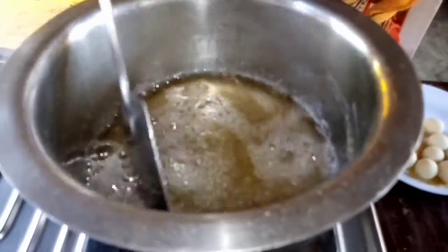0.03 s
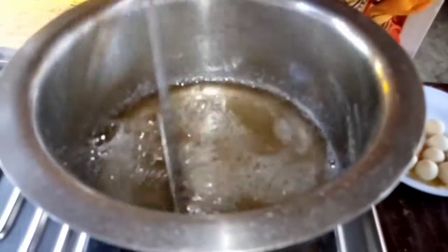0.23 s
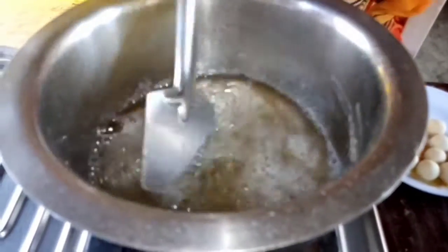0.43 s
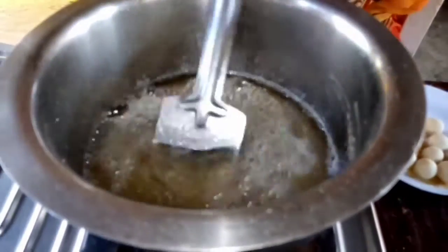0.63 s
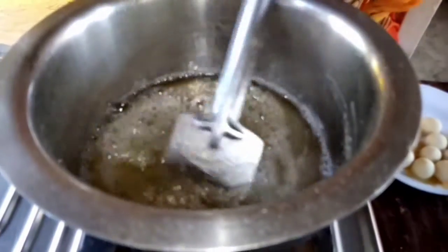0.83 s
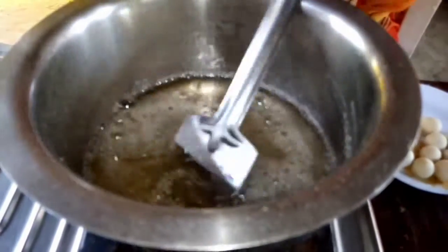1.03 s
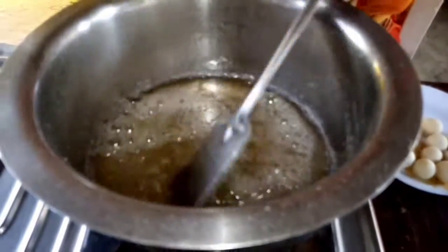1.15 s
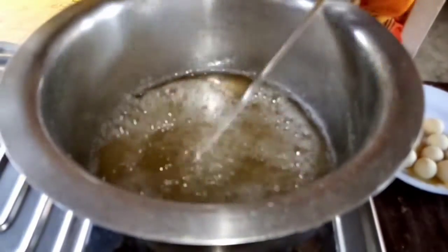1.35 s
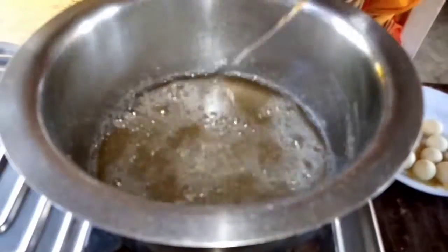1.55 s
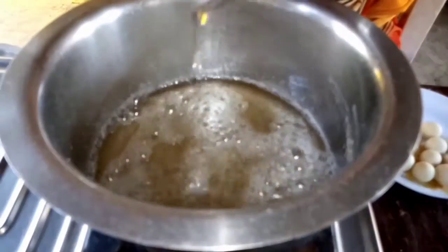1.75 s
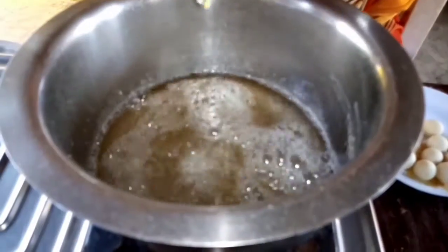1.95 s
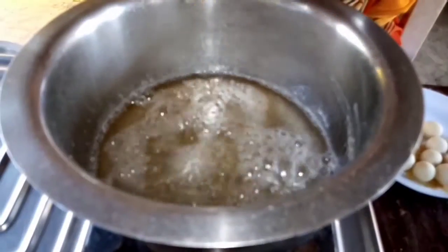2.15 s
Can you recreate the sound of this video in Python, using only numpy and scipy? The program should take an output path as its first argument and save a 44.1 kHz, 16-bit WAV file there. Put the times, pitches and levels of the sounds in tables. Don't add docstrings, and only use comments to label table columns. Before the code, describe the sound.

A steel spatula clatters onto the bottom of a metal pot, bounces, rings and scrapes, then lifts away, leaving quiet hissing, popping syrup over a low gas flame; close above the rim, faintly roomy.

```python
import sys
import numpy as np
from scipy import signal
from scipy.fft import rfft, irfft
from scipy.io import wavfile
from scipy.ndimage import uniform_filter1d

SR = 44100
rng = np.random.default_rng(int(sys.argv[2]) if len(sys.argv) > 2 else 0)


def to_linear_factor(level_db):
    exponent = np.asarray(level_db, float) / 20
    return 10 ** exponent


def master(y):
    cut = np.clip(np.atleast_2d(y).T, -1, 1)
    pcm = np.round(cut * 32767)
    wavfile.write(sys.argv[1], SR, pcm.astype(np.int16))


N = 97020


def set_level(x, db):
    return x * to_linear_factor(db) / np.sqrt(np.mean(x ** 2))


def high_pass(x, order, hz):
    return signal.sosfilt(signal.butter(order, hz, "high", fs=SR, output="sos"), x)


def band(x, hz, width_hz):
    b, a = signal.iirpeak(min(float(hz), 0.45 * SR), hz / width_hz / 1.55, fs=SR)
    once = signal.lfilter(b, a, x)
    return signal.lfilter(b, a, once)


def ring(x, modes):
    out = np.zeros(len(x))
    for hz, db, t60 in modes:
        pole = np.exp(2j * np.pi * hz / SR - np.log(1000) / (t60 * SR))
        out += to_linear_factor(db) * signal.lfilter([1], [1, -pole], x).imag
    return out


def colour(x, points):
    hz, db = np.array(points, float).T
    bins_hz = np.fft.rfftfreq(len(x), 1 / SR)
    gain_db = np.interp(np.log(bins_hz + 1), np.log(hz), db)
    return irfft(rfft(x) * to_linear_factor(gain_db), len(x))


def walk(rate_hz):
    hold = int(SR / rate_hz)
    steps = np.repeat(rng.standard_normal(N // hold + 1), hold)
    wander = uniform_filter1d(uniform_filter1d(steps, hold), hold)[:N]
    return (wander - wander.mean()) / wander.std()


def clicks(per_s, scatter_db):
    chance, side, size = rng.random((3, N))
    happens = chance < per_s / SR
    return set_level(happens * np.sign(side - 0.5) * to_linear_factor(-scatter_db * np.log(size + 0.01)), 0)


def tail(t60, seconds):
    t = np.arange(int(seconds * SR)) / SR
    noise = rng.standard_normal(len(t)) * to_linear_factor(-60 * t / t60)
    return noise / np.sqrt(np.sum(noise ** 2))


# (frequency [Hz], width [Hz], level [dB])
SIMMER_BANDS = [(616, 117, 2.5), (450, 75, -0.5), (1295, 154, -7), (1890, 280, -14.5), (3100, 920, -6.5),
                (4800, 1580, -3), (6070, 750, -3), (9730, 1600, -15), (15000, 840, -4.5),
                (13100, 2700, -15.5)]


def simmer():
    pops = to_linear_factor(-6) * clicks(per_s=700, scatter_db=4.5)
    swell_db = 1.0 * walk(4.02)
    out = np.zeros(N)
    for hz, width_hz, db in SIMMER_BANDS:
        flicker_db = 0.5 * walk(17.63)
        hiss = rng.standard_normal(N)
        out += to_linear_factor(db + swell_db + flicker_db) * band(hiss + pops, hz, width_hz)
    return set_level(out, -55)


def ticks():
    fade = to_linear_factor(-60 * np.arange(441) / SR / 0.005)
    noise = rng.standard_normal(N)
    envelope = signal.fftconvolve(clicks(per_s=150, scatter_db=3.0), fade)[:N]
    snap = high_pass(noise * envelope, 2, 6000)
    mic_peak = band(snap, 15000.0, 1100.0)
    return set_level(snap + to_linear_factor(5.0) * mic_peak, -68)


# (time [s], level [dB])
BOIL_LEVEL = [
    (0, 0.5),
    (.2, 0),
    (.5, -2),
    (.8, -2),
    (1.1, -0.5),
    (1.3, 0),
    (1.6, 1),
    (1.9, 0),
    (2.2, -1.5),
]


def boil(t):
    return to_linear_factor(np.interp(t, *np.array(BOIL_LEVEL).T)) * (simmer() + ticks())


# (frequency [Hz], level [dB per Hz])
FLAME_SPECTRUM = [(12, -63), (20, -35.5), (37, -38), (59, -12), (191, -6), (249, -8), (309, -25),
                  (420, -18), (550, -32.5), (920, -120)]


def burner(t):
    noise = rng.standard_normal(N)
    flutter_db, rise_db_per_s = 3.5, 2.5
    swell = to_linear_factor(flutter_db * walk(8.51) + rise_db_per_s * t)
    return set_level(colour(noise, FLAME_SPECTRUM) * swell, -67.5)


# (time [s], level [dB], floor thud [dB], blade ring [dB], rattle length [s])
BLADE_KNOCKS = [(0.206, -47, -13, -28, 0.00326), (0.2162, -18, -1, -34, 0.014),
                (0.2329, -23.5, 4.5, -18, 0.06), (.249, -23, -2, -16, 0.043), (.262, -25, 3.5, -31, 0.034),
                (.2725, -26.5, 0, -38, 0.029), (0.282, -40, 4.5, -30, 0.027),
                (0.288, -37, 10.5, -37, 0.023), (.349, -40.5, 3.5, -36, 0.033),
                (.372, -47.5, 5, -19, 0.0069), (0.5499, -25.5, -42, -3.5, 0.098),
                (0.5568, -22.5, -44, -13, 0.039), (0.684, -33, 2.5, -11, 0.05),
                (0.703, -29.5, -2, -32, 0.024), (.717, -39.5, 6.5, -11, 0.012),
                (0.725, -30.5, 1, -2.5, 0.028), (0.757, -36.5, -4.5, -35, 0.017),
                (0.797, -31, -11.5, -11, 0.032), (0.9475, -46, -0.5, -3, 0.015),
                (0.997, -42.5, 2.5, -10, 0.012), (1.061, -43.5, 0.5, -12, 0.019),
                (1.269, -40, -8, -4.5, 0.014), (1.406, -48, 0, 3, 0.006)]


def knocks(t):
    grit = rng.standard_normal(N)
    wall, floor, blade = np.zeros((3, N))
    for s, db, thud_db, ring_db, rattle_s in BLADE_KNOCKS:
        i = int(s * SR)
        rattle = to_linear_factor(db - 60 * t[:4410] / rattle_s)
        wall[i:i + 4410] += 0.17 * grit[i:i + 4410] * rattle
        wall[i] += 1.7 * to_linear_factor(db)
        floor[i] += 0.75 * to_linear_factor(db + thud_db)
        blade[i] += 1.04 * to_linear_factor(db + ring_db)
    return wall, floor, blade


# (time [s], pressure [dB], blade ring [dB])
SCRAPES = [(.214, -93, -30), (0.216, -27, -28), (.29, -44, -15), (.31, -49, -20), (.37, -52.5, 0),
           (.47, -52.5, -1), (.547, -78.5, -9), (0.549, -34.5, 9.5), (0.599, -50, 8.5), (.675, -50.5, 11),
           (0.719, -36.5, 4.5), (.76, -45, 5.5), (.94, -62.5, 1), (.95, -45.5, -6), (0.996, -43, -11),
           (1.01, -64, -1), (1.35, -50, -10), (1.6, -65.5, -1)]


def scrape(t):
    at, pressure_db, ring_db = np.array(SCRAPES).T
    slips = clicks(per_s=3000, scatter_db=2.0)
    unsteady_db = 2.9 * walk(58.5)
    drag = slips * to_linear_factor(np.interp(t, at, pressure_db) - 22.5 + unsteady_db)
    return drag, to_linear_factor(np.interp(t, at, ring_db)) * drag


# (frequency [Hz], gain [dB])
WALL_COLOUR = [(1100, -21.5), (1800, -15.5), (2400, -10.5), (5000, -1.5), (6700, -4.5), (8000, -16.5),
               (13000, -25), (15000, -14)]


def wall_clank(push):
    return signal.fftconvolve(push, colour(tail(0.0083, 0.1), WALL_COLOUR))[:N]


# (frequency [Hz], level [dB], t60 [s])
FLOOR_MODES = [(415, -12.5, 0.097), (513, -8, 0.21), (580.3, -7.5, 0.41), (694, 7.5, 0.022),
               (741, -4, 0.13), (827, -3, 0.086), (1033, 4.5, 0.012), (1246, -1, 0.047), (1566, -2.5, .04),
               (1940, -1.5, 0.029), (2570, -0.5, 0.074), (2972, -5, 0.1), (2230, -14, 0.09)]


def floor_thud(push):
    return ring(high_pass(push, 3, 400), FLOOR_MODES)


BLADE_PITCHES = [1015, 1240, 2051, 2338, 2977, 4653, 5227, 5490, 5679, 6295, 6508, 6690, 7400, 8700]
# (level [dB], t60 [s])
BLADE_FADES = [(-24.5, 1), (-22.5, 0.65), (-17, 0.15), (-4.5, 0.34), (-23.5, 0.85), (-15.5, 0.46),
               (-10.5, 0.14), (-8.5, .12), (-21, 0.33), (-7.5, 0.12), (-14, 0.13), (-8, 0.17), (-21, 0.17),
               (-21, .12)]


def blade_ring(hit, rub):
    modes = [(hz, db, t60) for hz, (db, t60) in zip(BLADE_PITCHES, BLADE_FADES)]
    twins = [(hz * 1.011, db + 4, 0.53 * t60) for hz, db, t60 in modes if hz > 2800]
    damping = to_linear_factor(4.0 * walk(38.7))
    low = ring(hit + 0.3 * rub, modes[:4])
    return low + damping * ring(hit + rub, modes[4:] + twins)


def spatula(t):
    wall, floor, blade = knocks(t)
    drag, rub = scrape(t)
    clank = to_linear_factor(14.5) * wall_clank(wall + 3.5 * drag)
    thud = to_linear_factor(-14.5) * floor_thud(floor + to_linear_factor(-11) * drag)
    return clank + thud + to_linear_factor(-10.5) * blade_ring(blade, rub)


# (time [s], level [dB], frequency [Hz], t60 [s])
POT_ROCK = (.262, -56, 98, .2)


def pot_rock(t):
    s, db, hz, t60 = POT_ROCK
    push = np.exp(-((t - s) / 0.0015) ** 2)
    return ring(push * to_linear_factor(db - 40.5), [(hz, 0, t60)])


# (start [s], length [s], level [dB], frequency [Hz], width [Hz])
SYRUP_RUNS = [
    (1.266, .25, -59, 3300, 1000),
    (2.071, .16, -65, 3600, 1300),
    (.801, .14, -63, 3300, 900),
]


def swish(t):
    grain = clicks(per_s=2800, scatter_db=2.3)
    out = np.zeros(N)
    for s, length, db, hz, width_hz in SYRUP_RUNS:
        u = np.clip((t - s) / length, 0, 1)
        envelope = np.minimum(u * 12, 1) * (1 - u) ** 0.25
        out += envelope * set_level(band(grain, hz, width_hz), db)
    return out


# (start [s], length [s], level [dB], first frequency [Hz], last frequency [Hz])
BIRD_CALLS = [
    (1.131, .16, -62, 4620, 4720),
    (1.571, .24, -70, 1320, 1305),
    (1.811, .09, -65, 3500, 3500),
    (1.951, .11, -58, 4680, 4600),
    (2.006, .095, -60, 4400, 4100),
    (2.041, .1, -71, 1280, 1250),
    (1.301, .05, -63, 5680, 5680),
    (1.271, .1, -63, 3330, 3300),
    (1.371, .08, -66, 2810, 2810),
]


def birds():
    out = np.zeros(N)
    wobble = walk(300.0) + 1j * walk(300.0)
    for s, length, db, first_hz, last_hz in BIRD_CALLS:
        start = int(s * SR)
        k = np.arange(min(int(length * SR), N - start))
        u = k / (length * SR)
        smear_at = int(s * SR / 2) + (k * (first_hz / 4000) ** 2.2).astype(int)
        smear = 0.5 + wobble[smear_at]
        glide_hz = first_hz + (last_hz - first_hz) * u
        tone = np.exp(2j * np.pi * np.cumsum(glide_hz) / SR)
        out[start + k] += to_linear_factor(db) * np.sqrt(np.sin(np.pi * u)) * (smear * tone).real
    return out


# (time [s], level [dB], frequency [Hz])
BUBBLES = [
    (1.59, -44, 6400),
    (1.7628, -43.5, 9240),
    (1.835, -41, 6170),
    (1.941, -36, 15000),
    (2.004, -39, 14300),
    (2.059, -52, 5930),
    (2.076, -43, 6600),
    (1.971, -45, 6840),
]


def bursts(t):
    out = np.zeros(N)
    for s, db, hz in BUBBLES:
        cycles = np.maximum(t - s, 0) * hz
        rise = 1 + 0.0045 * np.minimum(cycles, 60)
        out += to_linear_factor(db) * np.sin(2 * np.pi * cycles * rise) * np.exp(-cycles / 6.2)
    return out


def scene():
    t = np.arange(N) / SR
    near = spatula(t) + bursts(t) + birds() + swish(t)
    room = to_linear_factor(-17) * signal.fftconvolve(near, tail(0.3, 0.6))[:N]
    mix = near + room + boil(t) + pot_rock(t)
    mix += burner(t)
    return mix[None]


def band_limit(x):
    return signal.sosfilt(signal.butter(12, 16790, fs=SR, output="sos"), x)


def record(dry):
    top_cut = signal.ellip(12, 0.3, 36, 15500, fs=SR, output="sos")
    mix = signal.sosfilt(top_cut, dry)
    return band_limit(mix)


dry = scene()
out = record(dry)
master(out)
```